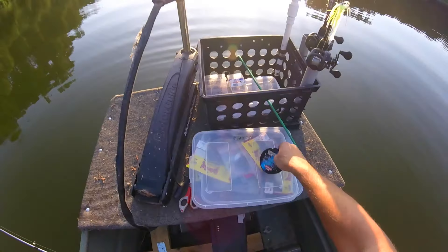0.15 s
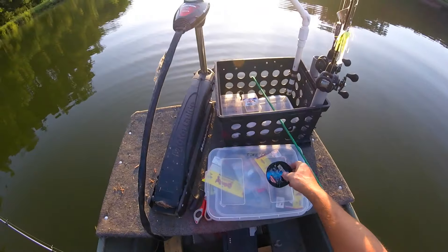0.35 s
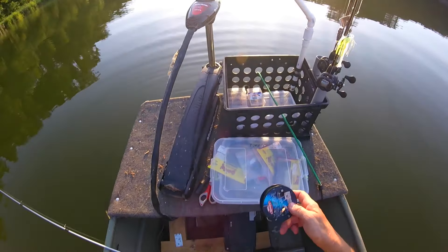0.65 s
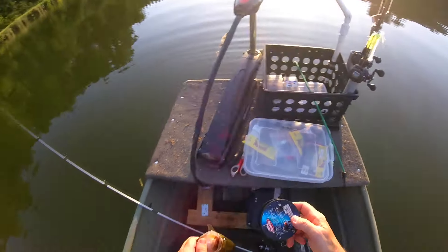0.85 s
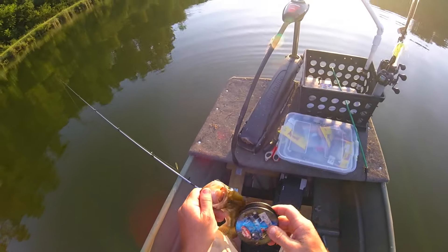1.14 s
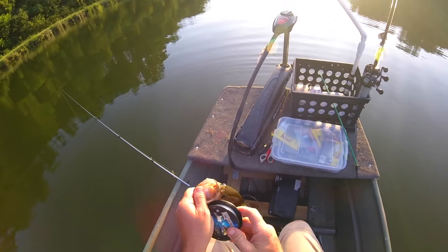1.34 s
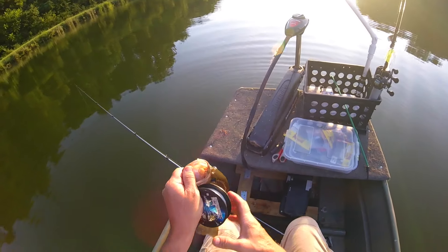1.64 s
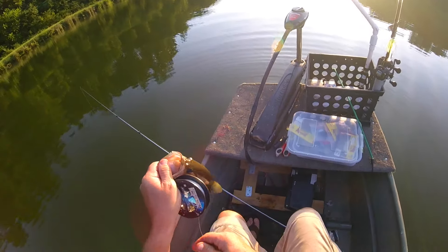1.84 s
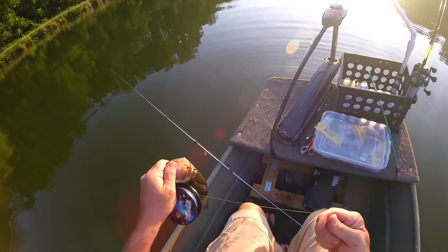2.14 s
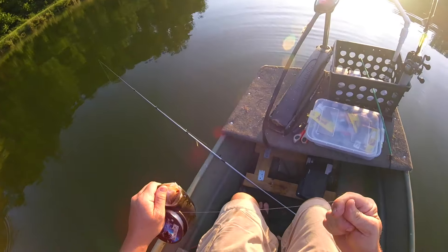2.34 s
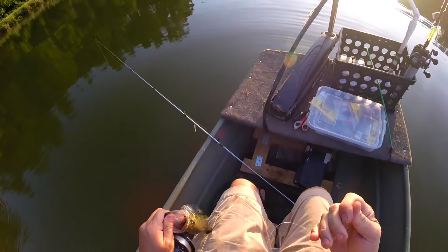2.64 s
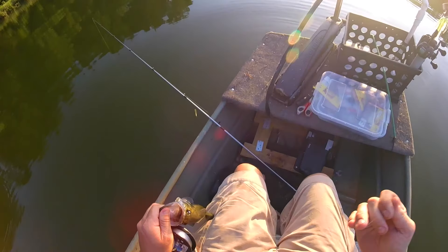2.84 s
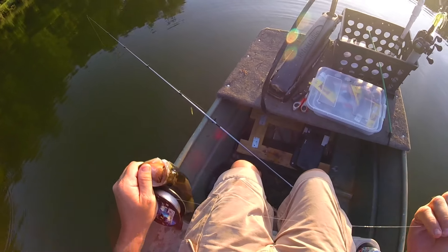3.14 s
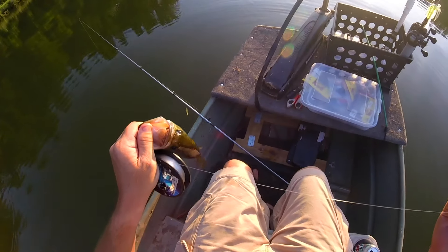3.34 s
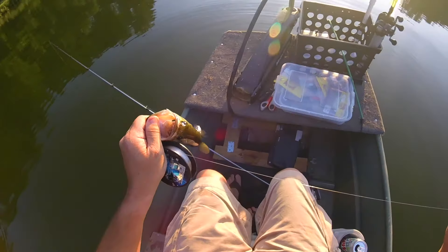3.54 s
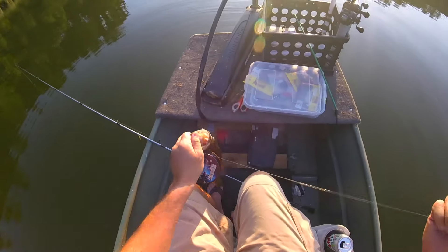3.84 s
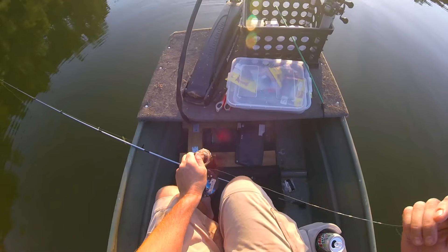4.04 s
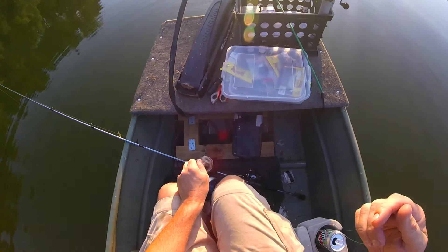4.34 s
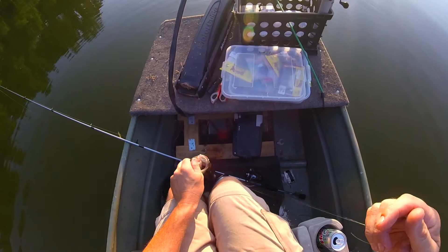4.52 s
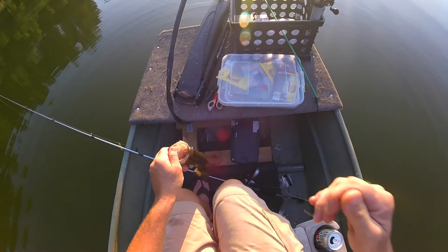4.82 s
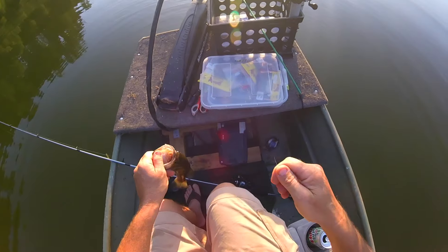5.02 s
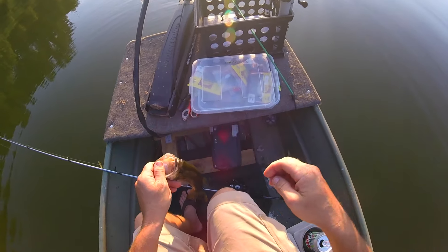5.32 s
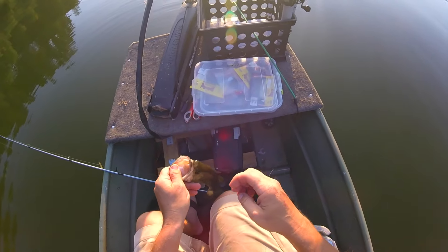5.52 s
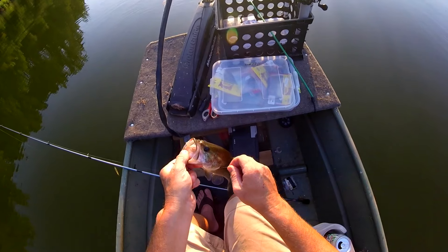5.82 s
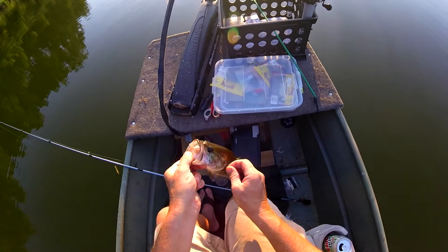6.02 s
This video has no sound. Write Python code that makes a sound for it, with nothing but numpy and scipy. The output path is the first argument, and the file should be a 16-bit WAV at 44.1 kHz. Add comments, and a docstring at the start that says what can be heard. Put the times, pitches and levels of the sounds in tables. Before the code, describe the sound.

Calm pond hiss and faint birds, a few close plastic clicks, then late on a snap, a heavy hull thump and rattling, clinking bounces.

```python
"""Fishing from a small aluminium boat on a calm pond: hiss of air and insects, low rumble and drone (noise bands).
Hands click a plastic spool (struck modes), bump tackle (damped notes) and rub line (stick-slip noise).
Far birds call, whistle and chirp (gliding tones with an echo). At 4.9 s tackle snaps; at 5.1 s gear drops in,
bounces, clinks and chatters to rest, and the hull booms and rocks under it (struck and jostled modes)."""
import sys
import numpy as np
from scipy import signal
from scipy.fft import rfft, irfft, next_fast_len
from scipy.io import wavfile
from scipy.ndimage import uniform_filter1d

SR = 44100
rng = np.random.default_rng(int(sys.argv[2]) if len(sys.argv) > 2 else 0)


def master_out(mix):
    """Clip the mix to full scale and print it as 16-bit PCM to the path in sys.argv[1]."""
    frames = np.transpose(np.atleast_2d(mix))
    ceiling = np.clip(frames, -1, 1)
    pcm = np.round(ceiling * 32767).astype(np.int16)
    wavfile.write(sys.argv[1], SR, pcm)


N = 272097

# main panel modes of the hull: hz, level_db, t60_s (at ring share 1)
HULL_PANEL_MODES = [(97.75, -6, 1), (124.7, -7.5, 1), (155.7, -10, 0.67), (184, -11, 1),
                    (281.3, -10.5, 0.6), (325.8, -2, 0.29), (368, -1, 0.32), (454, -5.5, 0.54),
                    (516, -10, 0.35), (602, -17, 0.24), (713, -15, 0.42), (872, -8, 0.21),
                    (975, -11.5, 0.28), (1170, -15.5, 0.27)]
# the hull's crowd of weaker modes: hz, level_db_per_hz, t60_s (at ring share 1)
HULL_CROWD = [(45, -27, 0.47), (85, -17, 1), (151, -10, 1), (258, -9.5, 0.92), (334, -4, 1),
              (503, 0.5, 0.42), (634, -10, 0.56), (980, -15.5, 0.36), (1460, -24.5, 0.42)]
# main modes of the falling gear: hz, level_db, t60_s (at ring share 1)
GEAR_MAIN_MODES = [(1820, -15, 0.21), (2084, -11.5, 0.15), (2235, -14, 0.046), (2534, -7.5, 0.12),
                   (2780, -12, 0.019), (3034, -0.5, 0.031), (4100, -10.5, 0.065), (6485, -19.5, 0.045)]
# the gear's crowd of weaker modes: hz, level_db_per_hz, t60_s (at ring share 1)
GEAR_CROWD = [(400, 17.5, 0.3), (1090, 5.5, 0.4), (1660, 0, 0.23), (2660, 6, 0.19), (4950, -4, 0.12),
              (6140, -9.5, 0.076), (8350, -22, 0.051), (12900, -33, 0.01)]


def from_db(db):
    """Decibels to gain."""
    return 10 ** (np.asarray(db) / 20)


def rms_one(x):
    """Scale to unit power."""
    return x / np.sqrt(np.mean(x ** 2) + 1e-20)


def level(rows):
    """Gain over time from (time_s, level_db) rows."""
    return from_db(np.interp(np.arange(N) / SR, *np.transpose(rows)))


def at_hz(rows, hz, axis=1):
    """Read one column of a table along log frequency."""
    rows = np.array(rows)
    return np.interp(np.log(hz + 1), np.log(rows[:, 0]), rows[:, axis])


def colour(x, spectrum):
    """Shape a signal by a spectrum that falls away beyond its ends; unit power."""
    size = next_fast_len(len(x))
    hz = np.fft.rfftfreq(size, 1 / SR)
    top_end = 1 / (1 + (hz / spectrum[-1][0] / 1.3) ** 6)
    low_end = 1 / (1 + (spectrum[0][0] / (hz + 1) / 1.5) ** 4)
    gain = top_end * low_end * from_db(at_hz(spectrum, hz))
    return rms_one(irfft(rfft(x, size) * gain, size)[:len(x)])


def add(out, s, sound):
    """Mix a sound in at a time."""
    start = max(0, round(s * SR))
    out[start:start + len(sound)] += sound[:max(0, N - start)]


def bouts(rows, attack_s, fall_db_per_s):
    """Gain over time: each bout (start_s, level_db, hold_s) builds up, holds and dies away."""
    t = np.arange(N) / SR
    power = np.zeros(N)
    for s, db, hold_s in rows:
        attack = np.clip((t - s) / attack_s, 0, 1)
        falling_s = np.clip(t - s - attack_s - hold_s, 0, 2)
        power += (attack * from_db(db - fall_db_per_s * falling_s)) ** 2
    return np.sqrt(power)


def tones(modes, t, tilt_db, ring, scatter_db):
    """A body's main modes as dying sines, each with a random strength and phase."""
    hz, db, t60_s = np.transpose(modes)[:, :, None]
    scatter = scatter_db * rng.standard_normal(hz.shape)
    strength = from_db(db + tilt_db * np.log2(hz / np.median(hz)) + scatter)
    t60_s = np.minimum(ring * t60_s, 1)   # the water lets no main mode ring for over a second
    sines = np.sin(2 * np.pi * (hz * t + rng.random(hz.shape)))
    return np.sum(strength * sines * np.exp(-np.log(1000) * t / t60_s), axis=0)


def wash(rows, t, tilt_db, ring):
    """A crowd of modes too dense to tell apart: noise that dies band by band."""
    hz = np.fft.rfftfreq(len(t), 1 / SR)
    spectrum = [(f, db + tilt_db * np.log2(f)) for f, db, t60_s in rows]
    noise = rfft(colour(np.sign(rng.standard_normal(len(t))), spectrum))
    half_octave = np.round(2 * np.log2(np.maximum(hz, 60)))
    out = np.zeros(len(t))
    for k in np.unique(half_octave):
        t60_s = ring * at_hz(rows, 2 ** (k / 2), axis=2)
        out += irfft(noise * (half_octave == k), len(t)) * 1e-3 ** (t / t60_s)
    return out


def struck(blows, modes, crowd, modes_db, crowd_db, rise_s, near_db, near_s, size):
    """Each blow sets a body's main modes and its crowd of weak ones ringing."""
    out, t = np.zeros(N), np.arange(size) / SR
    rise = 1 - np.exp(-(t / rise_s) ** 2)
    # the spot that was hit sounds strongest at first, until the vibration has spread over the body
    near = 1 + from_db(near_db) * np.exp(-(t / near_s) ** 2)
    for s, db, tilt_db, ring in blows:
        main = from_db(modes_db) * tones(modes, t, tilt_db, ring, scatter_db=1.0)
        weak = from_db(crowd_db) * wash(crowd, t, tilt_db, ring)
        add(out, s, from_db(db) * rise * near * (main + weak))
    return out


def grains(per_s, spread_db):
    """Random tiny contacts of uneven size."""
    sizes = from_db(spread_db * np.minimum(rng.exponential(1, N), 3))
    return sizes * rng.choice([-1, 1], N) * (rng.random(N) < per_s / SR)


def jostled(gain, modes, crowd, modes_db, tilt_db, ring, rise_s, per_s, spread_db, size):
    """Light, quick touches keep a body ringing; its level is evened out, then follows the gain."""
    t = np.arange(size) / SR
    main = from_db(modes_db) * tones(modes, t, tilt_db, ring, scatter_db=1.5)
    body = main + wash(crowd, t, tilt_db, ring)
    rise = 1 - np.exp(-(t / rise_s) ** 2)
    rattle = signal.fftconvolve(grains(per_s, spread_db), body * rise)[:N]
    strength = np.sqrt(np.abs(uniform_filter1d(rattle ** 2, SR // 12)) + 1e-12)
    return gain * rattle / strength


def pond():
    """Smooth hiss of far insects and air over a low rumble and a faint drone that swells once."""
    # still air and insects: hz, level_db_per_hz
    air_spectrum = [(25, -18), (150, 9.5), (400, 1.5), (850, 0.5), (1500, -5), (2400, -9), (3800, -3),
                    (5600, -6), (6500, -7), (7100, -3.5), (8000, -10), (10000, -18), (12500, -22)]
    # level of the hiss: time_s, level_db
    air_level = [(0, -56), (1.5, -53.5), (4.7, -51), (5.65, -53), (5.9, -52.5)]
    # low rumble: hz, level_db_per_hz
    rumble_spectrum = [(30, 1), (60, -1.5), (85, -3.5), (112, -5.5), (140, -26), (220, -26.5), (500, -45)]
    # swell of the drone: start_s, level_db, hold_s
    drone_swell = [(2.1, -54.5, 0.61)]
    rumble_db, drone_db = -47.5, -57
    air = level(air_level) * colour(rng.standard_normal(N), air_spectrum)
    rumble = from_db(rumble_db) * colour(rng.standard_normal(N), rumble_spectrum)
    drone_band = signal.butter(2, [98, 122], "band", fs=SR, output="sos")
    drone = rms_one(signal.sosfilt(drone_band, rng.standard_normal(N)))
    drone_gain = from_db(drone_db) + bouts(drone_swell, attack_s=0.74, fall_db_per_s=70)
    return air + rumble + drone_gain * drone


def spool():
    """Clicks of a handled plastic spool ring its modes."""
    # clicks: start_s, level_db, tilt_db_per_octave, ring_share
    clicks = [(.004, -37, -5.5, 1.7), (.019, -29, -5, 0.3), (.0505, -24, -1, 0.2), (.148, -37.5, 3, 0.45),
              (.9028, -19.5, 1, 1.36), (1.1335, -39, 0, 1.2), (1.142, -43.5, -0.5, 2.3),
              (1.17, -43, -1, 1.5), (1.236, -43, -4.5, 4.3), (2.213, -50.5, -6, 0.9)]
    # main modes: hz, level_db, t60_s (at ring share 1)
    modes = [(828, -9, 0.063), (1178, -24, 0.16), (1814, -5.5, 0.053), (2810, -4.5, 0.04),
             (3110, -31, 0.081), (3770, -12.5, 0.1), (6500, -13.5, 0.025)]
    # weaker modes: hz, level_db_per_hz, t60_s (at ring share 1)
    crowd = [(120, -7, 0.061), (400, 0.5, 0.42), (1030, 0.5, 0.16), (2860, 2.5, 0.093), (5000, -2, 0.029),
             (8100, -2, 0.008), (13000, -16, 0.022)]
    return struck(clicks, modes, crowd, modes_db=-7.0, crowd_db=-6.5,
                  rise_s=0.0011, near_db=1.5, near_s=0.0083, size=8192)


def bumps():
    """Hands bump tackle; flesh damps a contact to one short low note in a dull puff."""
    # bumps: start_s, level_db, pitch_hz, t60_s
    contacts = [(0.017, -19, 402, 0.028), (0.052, -38.5, 140, 0.35), (.147, -31, 565, 0.065),
                (.206, -32, 470, 0.13), (1.36, -30.5, 530, 0.1), (2.21, -39, 824, 0.029),
                (6.116, -32, 400, 0.048)]
    puff_db = 1   # against the note
    out, t = np.zeros(N), np.arange(SR // 4) / SR
    rise = 1 - np.exp(-(t / 0.0022) ** 2)
    for s, db, hz, t60_s in contacts:
        puff = colour(rng.standard_normal(len(t)), [(hz / 2, -3), (hz, 0), (1.87 * hz, -8)])
        body = np.sin(2 * np.pi * hz * t) + from_db(puff_db) * puff
        add(out, s, from_db(db) * body / 2 * rise * np.exp(-np.log(1000) * t / t60_s))
    return out


def rubbing():
    """Fingers slide on plastic and line: skin catches and slips, each slip a brief puff of friction noise."""
    # strokes: firmest_pressure_s, level_db, length_s, tilt_db_per_octave
    strokes = [(0.208, -40.5, 0.17, 1), (0.328, -50.5, 0.039, -3.5), (1.154, -47, 0.12, 1),
               (1.221, -43, 0.04, -1.3)]
    # friction noise: hz, level_db_per_hz
    spectrum = [(200, -1), (600, 7.5), (1300, 4.5), (2500, 1), (6500, -8), (9000, -17), (13000, -35)]
    slip_decay_s = 0.002
    swell_db, ease_db = 23, 35.5   # level lost one stroke length before and after the firmest pressure
    out, t = np.zeros(N), np.arange(N) / SR
    catches = np.abs(grains(per_s=1600, spread_db=-2.5))
    slips = signal.fftconvolve(catches, np.exp(-t[:SR // 20] / slip_decay_s))[:N]
    friction = slips * rng.standard_normal(N)
    for s, db, length_s, tilt_db in strokes:
        along = np.clip((t - s) / length_s, -10, 10)
        pressure = from_db(db - np.maximum(-swell_db * along, ease_db * along))
        tilted = [(hz, band_db + tilt_db * np.log2(hz)) for hz, band_db in spectrum]
        out += pressure * colour(friction, tilted)
    return out


def note(hz, harmonics):
    """One bird note along a pitch path: it swells and fades, and wavers in pitch and level."""
    waver_share, flutter_db = 0.0034, 2
    waver = rms_one(uniform_filter1d(rng.standard_normal(len(hz)), SR // 80))
    flutter = rms_one(uniform_filter1d(rng.standard_normal(len(hz)), SR // 40))
    phase = 2 * np.pi * np.cumsum(hz * (1 + waver_share * waver)) / SR
    arch = np.sqrt(np.abs(np.sin(np.linspace(0, np.pi, len(hz)))))
    swell = arch * rms_one(from_db(flutter_db * flutter))
    return swell * sum(from_db(db) * np.sin(round(k) * phase) for k, db in harmonics)


def scoop(length_s, octaves):
    """Pitch factor of a note that slides up from below and settles."""
    return 2 ** (-octaves * np.linspace(1, 0, int(length_s * SR)) ** 3)


def birds(echo_db, echo_t60_s):
    """Nasal calls, thin whistles and upward chirps, with their echo from the trees on the bank."""
    # far birds trade one nasal call: start_s, level_db, settled_fundamental_hz, length_s
    calls = [(0.589, -68, 410.5, 0.14), (1.53, -67, 412, 0.19), (1.764, -68, 413, 0.093),
             (2.47, -63, 413.7, 0.25), (3.389, -63, 410.5, 0.21), (3.617, -62.5, 425, 0.16),
             (4.306, -59.5, 415.3, 0.23), (5.836, -57, 416.3, .18), (6.025, -61.5, 429, 0.13)]
    # call harmonics that carry over the water: multiple, level_db
    harmonics = [(7, -4), (8, 0), (9, -6.5), (10, -8)]
    # whistles: start_s, level_db, settled_pitch_hz, length_s
    whistles = [(.95, -62, 4230, .19), (1.55, -61, 3710, .16), (1.72, -63.5, 3880, 0.16),
                (1.92, -65, 4230, .15), (2.44, -59.5, 3910, 0.13), (3.14, -60, 3890, 0.186),
                (3.87, -62, 3890, 0.22), (3.88, -62, 4270, 0.063), (4.7, -61.5, 4280, 0.12)]
    # chirps: start_s, level_db, starting_pitch_hz, rise_octaves
    chirps = [(1.66, -60, 3680, .27), (1.862, -55.5, 3810, 0.43), (2.069, -56.5, 3950, .39),
              (2.375, -61, 3250, .24)]
    call_scoop_octaves, whistle_scoop_octaves = 0.023, 0.0432
    chirp_s, chirp_curve = 0.045, 1.8   # pitch climbs as this power of time
    out, t, pure = np.zeros(N), np.arange(SR // 2) / SR, [(1, 0)]
    for s, db, hz, length_s in calls:
        add(out, s, from_db(db) * note(hz * scoop(length_s, call_scoop_octaves), harmonics))
    for s, db, hz, length_s in whistles:
        add(out, s, from_db(db) * note(hz * scoop(length_s, whistle_scoop_octaves), pure))
    climb = (t[t < chirp_s] / chirp_s) ** chirp_curve
    for s, db, hz, octaves in chirps:
        add(out, s, from_db(db) * note(hz * 2 ** (octaves * climb), pure))
    trees = rng.standard_normal(len(t)) * np.exp(-np.log(1000) * t / echo_t60_s)
    echo = signal.fftconvolve(out, trees / np.linalg.norm(trees))[:N]
    return out + from_db(echo_db) * echo


def snap():
    """A sharp snap of tackle and its rebound ring the tackle's modes."""
    # snap and rebound: start_s, level_db, tilt_db_per_octave, ring_share
    blows = [(4.8773, -12, -2.5, 0.96), (4.8895, -26, 2, 0.49)]
    # main modes: hz, level_db, t60_s (at ring share 1)
    modes = [(1596, -11.5, 0.08), (1840, -19, 0.08), (2020, -5, 0.045), (2480, -7, 0.045),
             (3170, -8, 0.089), (3710, -2.5, 0.056), (4930, 6.5, 0.024), (6230, -1, 0.035)]
    # weaker modes: hz, level_db_per_hz, t60_s (at ring share 1)
    crowd = [(300, -10.5, 0.1), (1100, -19.5, 0.32), (1900, -4.5, 0.085), (4900, 8.5, 0.057),
             (6970, -1, 0.027), (9200, -13, 0.067), (12900, -25, .03)]
    return struck(blows, modes, crowd, modes_db=-4.0, crowd_db=-5.0,
                  rise_s=0.00043, near_db=-15.0, near_s=0.0015, size=8192)


def hull_thumps():
    """Blows reaching the hull set its panels booming."""
    # blows: start_s, level_db, tilt_db_per_octave, ring_share
    blows = [(4.889, -34.5, -3, 1), (5.1055, -9.5, 1, 0.96), (5.135, -20, -5.5, 0.52),
             (5.188, -18, 3, 0.92), (5.487, -33, -2, 0.64)]
    return struck(blows, HULL_PANEL_MODES, HULL_CROWD, modes_db=-1.0, crowd_db=-2.5,
                  rise_s=0.0036, near_db=-6.0, near_s=0.018, size=49152)


def gear_clacks():
    """Gear lands and bounces; a harder blow rings longer."""
    # landing and bounces: start_s, level_db, tilt_db_per_octave
    bounces = [(5.1042, -11, 3), (5.188, -17.5, 1), (5.2161, -27.5, 15.5), (5.2386, -28, 3),
               (5.275, -38, 7), (5.3676, -33, -0.5), (5.3918, -38, 3), (5.4138, -29.5, -3),
               (5.4523, -38, 1), (5.4791, -33.5, 1), (5.5072, -29.5, -1.5), (5.545, -39, 0),
               (5.6225, -39.5, 3.5)]
    full_ring_share, ring_doubles_db = 0.79, 53   # share at 0 dB; level step that doubles it
    blows = [(s, db, tilt_db, full_ring_share * 2 ** (db / ring_doubles_db)) for s, db, tilt_db in bounces]
    return struck(blows, GEAR_MAIN_MODES, GEAR_CROWD, modes_db=-7.0, crowd_db=-8.5,
                  rise_s=0.00036, near_db=-1.5, near_s=0.0084, size=12288)


def clinks():
    """A small metal fitting rings briefly with a few clear modes on some of the bounces."""
    # clinks: start_s, level_db, tilt_db_per_octave
    hits = [(5.193, -29, 10), (5.217, -21.5, -3), (5.4795, -29, -2), (5.5065, -27.5, -0.5)]
    # the fitting's modes: hz, level_db, t60_s
    modes = [(2530, -2, .035), (2700, -8.5, .03), (4380, -17, .03), (6220, -7.5, 0.035), (6550, -12, 0.033)]
    rise_s = 0.00061
    out, t = np.zeros(N), np.arange(SR // 8) / SR
    rise = 1 - np.exp(-t / rise_s)
    for s, db, tilt_db in hits:
        add(out, s, from_db(db) * rise * tones(modes, t, tilt_db, 1, scatter_db=1.0))
    return out


def rocking():
    """The gear rocks on the hull in two bouts, its many light touches keeping the panels ringing."""
    # bouts: start_s, level_db, hold_s, tilt_db_per_octave
    rows = [(5.194, -18.5, 0.086, -4.5), (5.475, -27.5, 0.12, -4.5)]
    out = np.zeros(N)
    for s, db, hold_s, tilt_db in rows:
        gain = bouts([(s, db, hold_s)], attack_s=0.015, fall_db_per_s=113)
        out += jostled(gain, HULL_PANEL_MODES, HULL_CROWD, modes_db=-6.0, tilt_db=tilt_db, ring=0.65,
                       rise_s=0.0018, per_s=240, spread_db=2.0, size=24576)
    return out


def gear_chatter():
    """The gear's loose parts chatter as it tips over, in dense tiny contacts."""
    # bout: start_s, level_db, hold_s
    rows = [(5.37, -43.5, 0.086)]
    gain = bouts(rows, attack_s=0.01, fall_db_per_s=198)
    return jostled(gain, GEAR_MAIN_MODES, GEAR_CROWD, modes_db=-7.5, tilt_db=1.5, ring=0.32,
                   rise_s=0.00043, per_s=450, spread_db=0.5, size=4096)


def scene():
    """Everything in the boat is close and dry over open water."""
    hull_lowest_hz = 46   # the panels radiate little below this
    radiation = signal.butter(2, hull_lowest_hz, "high", fs=SR, output="sos")
    around = pond() + birds(echo_db=0.5, echo_t60_s=0.6)
    hands = spool() + bumps() + rubbing()
    boom = signal.sosfilt(radiation, hull_thumps() + rocking())
    drop = snap() + gear_clacks() + clinks() + boom + gear_chatter()
    return (around + hands + drop)[None]


def record(dry):
    """The microphone port rings in the treble, peaks are rounded at full scale and the top is cut."""
    # port resonances added to the direct sound: hz, width_hz, added_db
    port_modes = [(6493, 224, 7.5), (11600, 117, 2)]
    stop_band_hz = 14350
    loud = dry.copy()
    for hz, width_hz, db in port_modes:
        loud += from_db(db) * signal.lfilter(*signal.iirpeak(hz, hz / width_hz, fs=SR), dry)
    rounded = loud / (1 + loud ** 6) ** (1 / 6)
    return signal.sosfilt(signal.cheby2(16, 70, stop_band_hz, fs=SR, output="sos"), rounded)


dry = scene()
out = record(dry)
master_out(out)
```